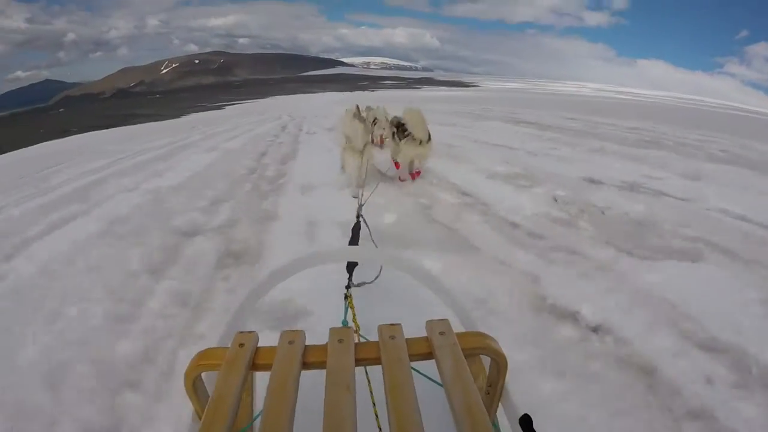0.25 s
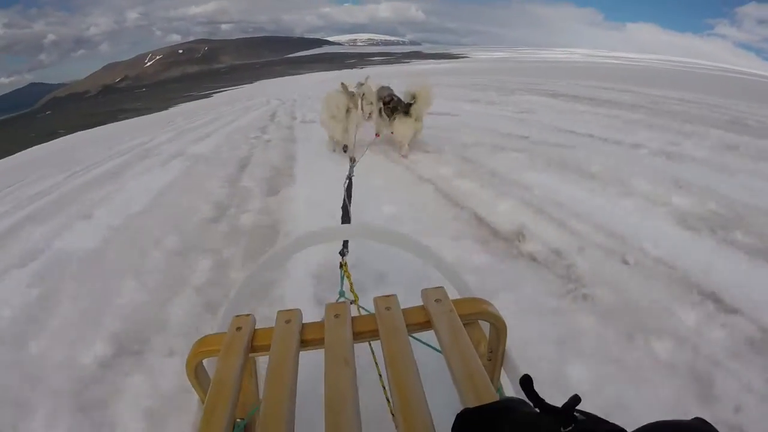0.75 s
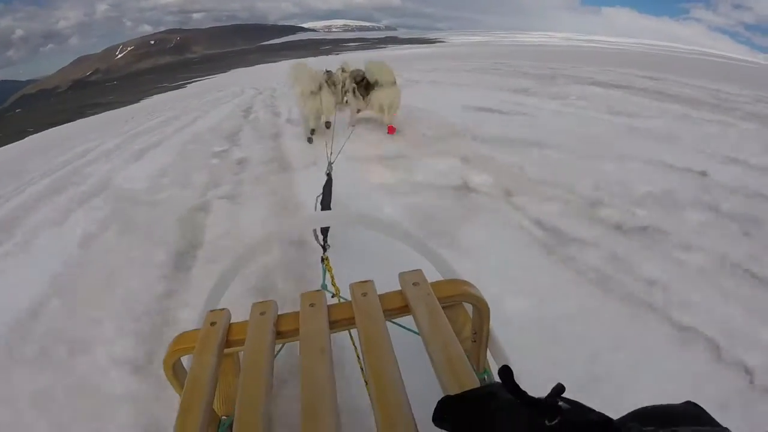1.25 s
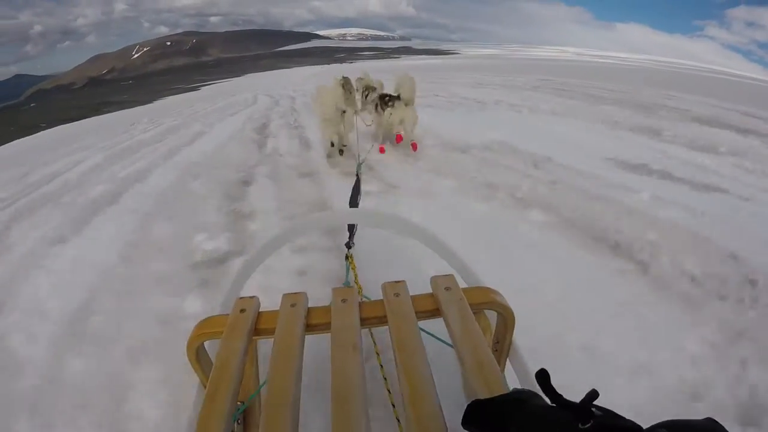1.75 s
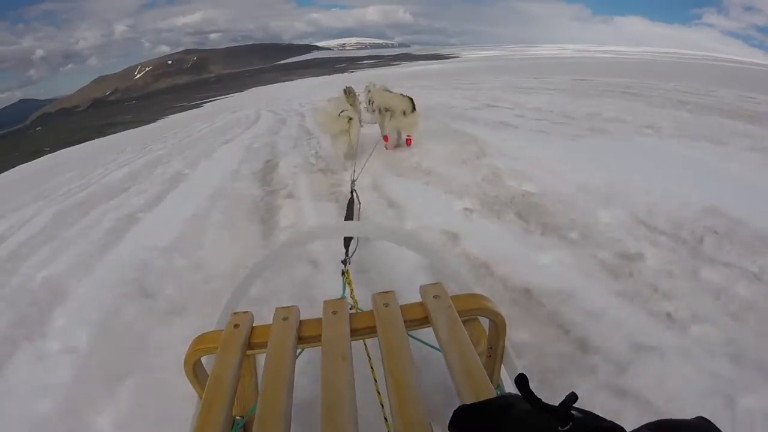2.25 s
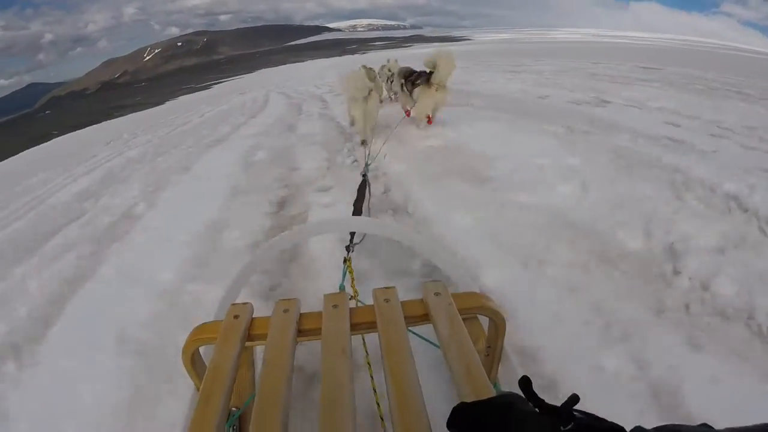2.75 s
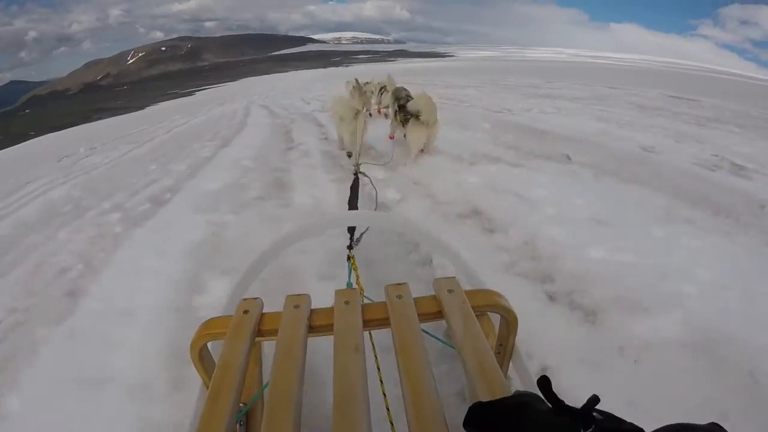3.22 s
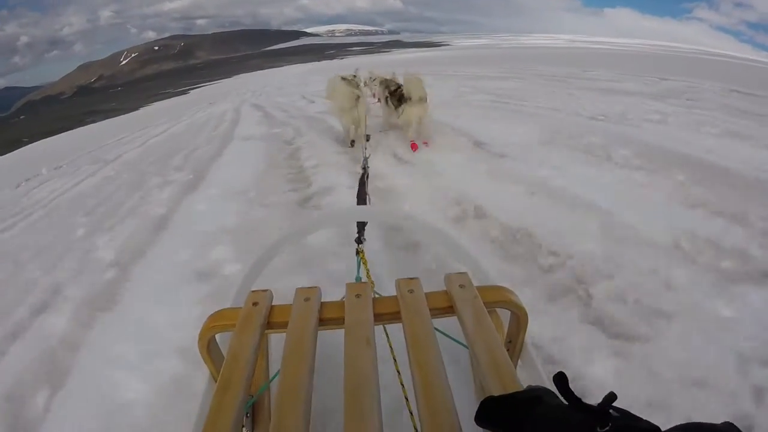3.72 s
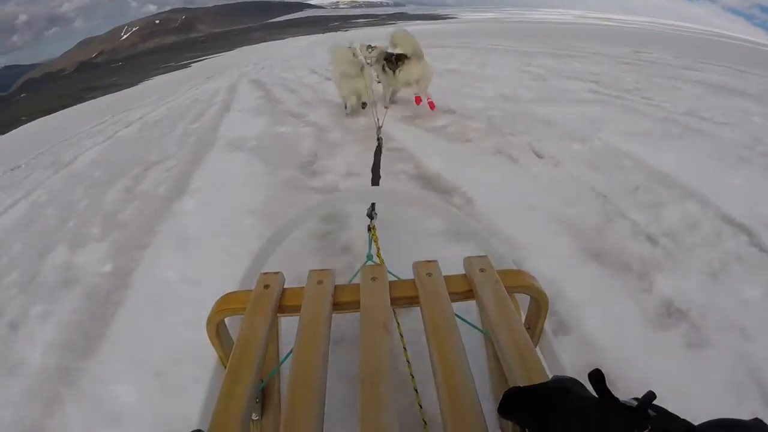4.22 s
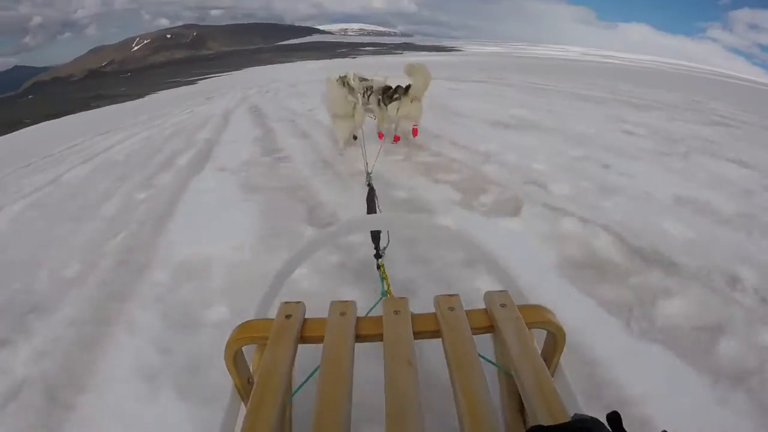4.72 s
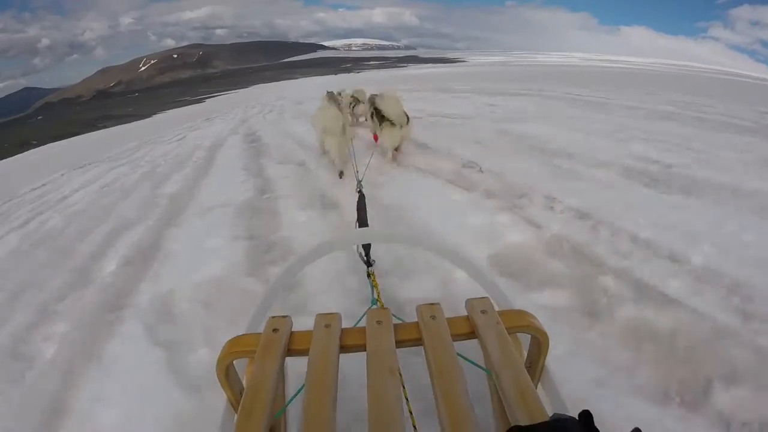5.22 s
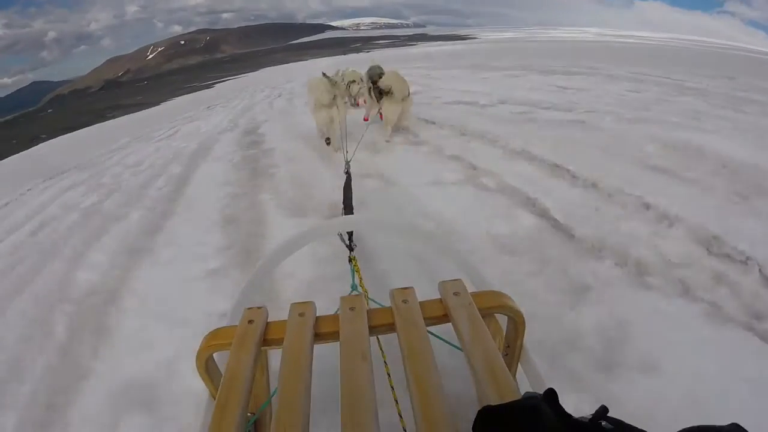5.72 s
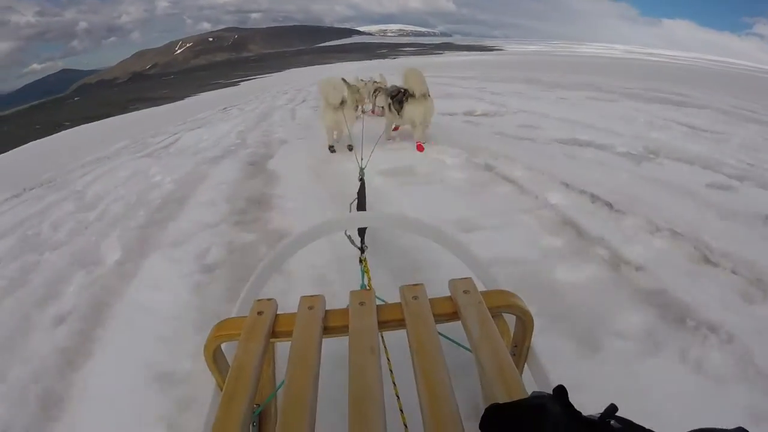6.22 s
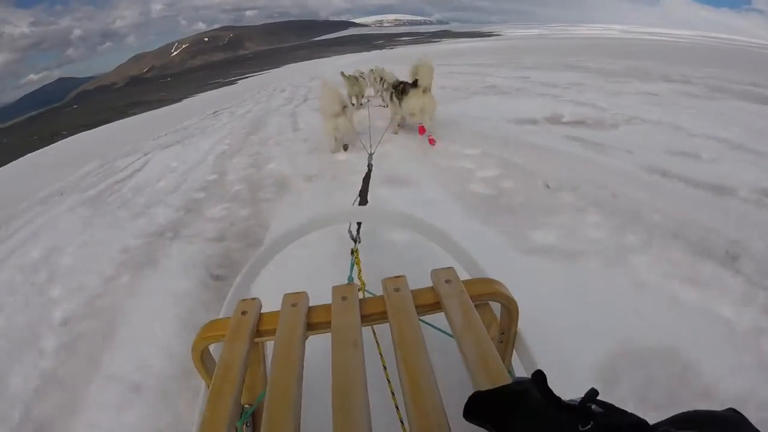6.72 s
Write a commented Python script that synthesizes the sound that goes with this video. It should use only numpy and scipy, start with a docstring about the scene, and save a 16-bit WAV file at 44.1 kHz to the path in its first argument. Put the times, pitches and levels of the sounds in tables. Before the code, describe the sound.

A wooden sled scrapes over rutted snow, its runners hissing in uneven swells and its frame knocking, while deep gusts buffet the microphone.

```python
"""Wind thumps and flutters over the gritty hiss of a dog sled gliding on packed, rutted snow.
We ride on the sled, listening from a small camera in a closed housing that the eddies buffet.
The runners grind snow grains, biting harder on each firm patch; the frame drones with them and the
housing's cavities colour the hiss. Now and then the wooden frame knocks on a rut, a metal clip ticks
and ice chips tap the housing."""
import sys
import numpy as np
from scipy import signal
from scipy.fft import rfft, irfft, next_fast_len
from scipy.io import wavfile
from scipy.ndimage import uniform_filter1d

SR = 44100
rng = np.random.default_rng(int(sys.argv[2]) if len(sys.argv) > 2 else 0)


def generate_wav(sig):
    """Save sig (samples, or channels by samples) to the path in sys.argv[1] as 16-bit PCM at SR."""
    pcm = np.round(np.clip(np.atleast_2d(sig).T, -1, 1) * 32767).astype(np.int16)
    wavfile.write(sys.argv[1], SR, pcm)


N = 307377

# Ticks of the metal clip: t/s, level/dB, f/Hz struck hardest
CLIP_HITS = [(0.646, -41, 8700), (0.796, -47, 9300), (1.0455, -39, 9050), (1.064, -36.5, 6840),
             (1.8344, -40, 8700), (1.842, -33, 8700), (1.845, -37, 7100), (1.8584, -39, 8990),
             (1.8654, -49, 6820), (5.5822, -36, 8150), (6.8838, -43, 7280)]
METAL_MODES = [(7020, -6, 0.024), (8600, 0, 0.0044), (9900, 2, 0.003), (11500, 1.5, .0025),
               (13900, 1, .003)]
# Ice chips thrown at the housing: t/s, level/dB, tilt toward the upper cavities/(dB per octave)
CHIP_HITS = [(0.65, -32, .1), (0.679, -26, 6), (0.754, -28.5, -3), (2.019, -23, 10), (2.04, -27, 8),
             (2.051, -25, 8), (2.12, -32, 8), (3.9583, -19, -.6), (4.201, -36, -3), (4.3161, -32, -1.5),
             (4.332, -26, -3), (6.07, -30, -3)]
# Ring of the housing's cavities: f/Hz, level/dB, t60/s
CAVITY_MODES = [(2350, 3, .014), (3720, 0, 0.011), (5700, -20, .006)]
# Hollow knocks of the frame on ruts: t/s, level/dB
RUT_HITS = [(0.648, -18), (0.754, -13), (1.234, -15), (2.081, -15), (2.213, -16.5), (3.116, -17),
            (3.179, -11), (3.691, -24), (4.319, -18), (4.333, -8), (4.642, -15), (6.07, -14), (6.078, -9),
            (6.085, -12), (1.394, -13), (4.328, -12), (4.344, -18), (1.365, -16), (1.41, -17), (1.46, -10),
            (3.24, -14)]
# Ring of the wooden slats: f/Hz, level/dB, t60/s
WOOD_MODES = [(595, -8, 0.039), (800, -5, 0.14), (930, 13.5, 0.037), (1170, -9, 0.03)]

# Hard patches of snow: bite t/s, ease-off t/s, sizzle at bite/dB, sizzle at ease-off/dB, fade/(dB/s),
# then trims: grind/dB, spray/dB, hiss/dB, dust/dB
HARD_PATCHES = [(0.0, 0.082, -40, -44.5, 97, -1.5, 3.5, 0, .1),
                (.39, 0.49, -54, -52, 47.5, -3.5, 4, -1, .1),
                (.525, .675, -48, -47.5, 60, -3, 3.5, -0.5, 2), (.72, 0.79, -49, -48.5, 58, -2, 4, 0, .1),
                (1.142, 1.253, -50.5, -45, 60, -2.5, 2.5, -1, 2),
                (1.26, 1.37, -43.5, -38.5, 60, -1, 2, 1.5, 2),
                (1.374, 1.45, -37, -38.5, 42, 1.5, 1.5, 2.5, -5),
                (1.47, 1.613, -39.5, -42, 53, 0.5, 1.5, 1, .1), (1.747, 1.9, -47, -51, 48, 1, 0, 2.5, .1),
                (2.053, 2.09, -52, -47, 60, -1.5, 4, 1, .1), (2.1, 2.19, -46.5, -46, 60, -1, 1.5, -0.3, 13),
                (2.238, 2.32, -46.5, -45, 50, -3, 3.5, -1.5, 2.1),
                (2.728, 2.863, -47.5, -43, 25, -1.5, 3, -0.8, .1),
                (2.875, 3.113, -46, -43, 26, -0.3, 4, 1.5, -4), (3.153, 3.256, -40.5, -42, 46, 1, 2, 1, -1),
                (3.28, 3.378, -43.5, -46, 45, -2, 2, -1.5, .1),
                (3.547, 3.78, -54, -48, 57, 0.5, 2, -0.2, .1), (3.82, 3.923, -49.5, -50, 43, 1, 4, 1.5, .1),
                (4.254, 4.3, -43.5, -47.5, 34, 1, 6, 1, 8),
                (4.318, 4.37, -38.5, -40.5, 34, -2.5, 2.5, -1, 9),
                (4.435, 4.55, -40, -39.5, 33, -2, 2.5, -1.5, 4),
                (4.61, 4.817, -39.5, -39, 48, -1.5, 2.5, -1.5, .1),
                (5.055, 5.134, -49, -40, 28, -3, 2.5, -1.8, -2.1),
                (5.138, 5.26, -42, -43, 35, -2.5, 0.5, -2.5, -4),
                (5.598, 5.672, -55, -44, 35, -0.8, 5, -1, -2.1),
                (5.68, 5.788, -44, -43, 37, -0.8, 3.5, -0.3, -5),
                (5.81, 5.963, -43.5, -44.5, 17, -2.5, 3.5, -0.2, 2),
                (6.04, 6.17, -44.5, -42, 60, -1.2, 2.5, 0, .1),
                (6.416, 6.594, -51.5, -49.5, 55.5, 0.5, 2.5, 0.7, -4),
                (6.735, 6.97, -53.5, -48, 50, -2.1, 4, 0, .1)]
# The runners' load shifts briefly over ridges: t/s, sizzle dip/dB (negative swells)
RIDGES = [(2.0, -3.5), (2.7, 0), (4.205, 0.5), (5.6, 0), (6.66, 2.5)]
# Grind, the frame droning up to 1 kHz: f/Hz, level/dB
GRIND_EQ = [(240, -22), (400, -5.5), (525, -2), (563, -2.5), (604, 0), (760, 0.4), (933, 2), (983, 1),
            (1070, -7), (1240, -8), (1370, -18), (1600, -40), (2080, -55), (3520, -120)]
# Hiss, ringing in two housing cavities: f/Hz, level/dB
HISS_EQ = [(880, -38), (1500, -3.5), (1690, -3), (1920, -1), (2220, 4), (2400, 4), (2560, 4), (2790, -5),
           (2920, -7), (3610, 1), (3810, -2), (4230, -21.5), (4400, -23), (5720, -75), (9680, -120)]
# Sizzle, ringing in a third cavity: f/Hz, level/dB
SIZZLE_EQ = [(2530, -24), (4350, -7), (4950, -1.5), (5400, 3.5), (5700, 4), (6150, 1), (6450, -0.2),
             (6800, -1), (7400, -12.5), (9490, -26.5), (16100, -120)]
# Bright snow spray: f/Hz, level/dB
SPRAY_EQ = [(4290, -100), (7500, -.6), (8300, 2), (11900, -0.5), (12800, -4.5), (16600, -42), (22000, -120)]
# Snow dust, the airy top: f/Hz, level/dB
DUST_EQ = [(9000, -40), (12500, -9), (13300, 1.5), (14600, 1.5), (15100, -3)]

# Slow ride of the wind's strength: t/s, buffet level/dB, flutter level/dB
WIND_LEVELS = [(0.0, -15, -24), (0.37, -13.5, -25), (0.78, -20.5, -27), (1.08, -18.5, -28.5),
               (1.34, -17.5, -24), (2.31, -17, -26), (2.48, -19.5, -30), (3.09, -14, -21.5),
               (3.38, -19, -33), (3.75, -21, -27), (4.12, -18.5, -29.5), (4.42, -18.5, -23.5),
               (4.7, -17, -23.5), (5.34, -12, -23), (5.94, -17.5, -25.5), (6.97, -20, -29.5)]
# Single gusts and brief lulls: t/s, buffet boost/dB, flutter boost/dB
GUSTS = [(.1, 6.5, 5), (.16, -4.5, -10), (.27, 2, 3.5), (.45, -2, 1), (.6, -1.5, -0.5), (.7, 0.5, -5.5),
         (.78, 5, 4.5), (.97, -4, -5), (1.2, 4.5, 5), (1.38, 2.5, 5.5), (1.28, 0, 4.5), (1.61, 1.5, 1),
         (1.75, 3, 1.5), (1.95, 2.5, 1.5), (2.2, -2.5, 4.5), (2.8, -1, 6), (2.08, 5, 2.5), (2.46, 9, 4.5),
         (3.03, 2.5, 4.5), (3.2, -4, 9), (3.34, -5, 5), (3.76, 11.5, 1), (4.02, -9, -1), (4.25, 6.5, 1.5),
         (4.37, 5.5, 5), (4.73, 8.5, 5.5), (4.86, -8, 5.5), (4.99, 7.5, 9.5), (5.27, -0.5, -1),
         (5.4, 0, 1.5), (5.49, -2, -3.5), (5.57, 0, 2), (5.64, 3.5, 0.5), (5.76, 5.5, -8),
         (5.83, -11, -0.5), (5.95, -5, -0.5), (6.15, 0, 1.5), (6.29, 0, 2), (6.37, 7.5, 2.5),
         (6.579, 4, 10.5), (6.85, 5.5, 7), (6.92, 1.5, 3.5)]
# Deep buffeting on the housing: f/Hz, level/dB
BUFFET_EQ = [(5, -22), (10, -0.5), (18, 1.5), (28, 0.5), (50, 2), (75, -2.5), (115, -9), (150, -40.5),
             (250, -120)]
# Quicker flutter above the buffeting: f/Hz, level/dB
FLUTTER_EQ = [(74, -19.5), (125, -0.5), (180, -5.5), (250, -14), (400, -36), (700, -120)]
# Rustle, the top of the flutter: f/Hz, level/dB
RUSTLE_EQ = [(150, -30), (230, -3.5), (300, 0.5), (430, -5), (560, -9.5), (950, -110)]

SOFT_DB, FIRM_DB, THICK_DB = -55.5, -45, -51  # sizzle on soft snow, on firm snow; thick spray
BITE_DB_PER_S, RIDGE_HALF_WIDTH_S, GUST_HALF_WIDTH_S = 480, 0.027, 0.037
SPRAY_LAG_S, SPRAY_DUCK = 0.042, 0.3  # spray loses this many dB per dB of sudden rise in sizzle
DUST_FADE = 0.08  # dB lost per squared dB of spray under THICK_DB
RUSTLE_DB, RUSTLE_SHARE = -7, 0.52  # rustle against flutter; extra share of the flutter's gust boost
CHIP_ATTACK_S, HIGH_CUT_HZ = 0.0011, 15154
HOP = 64  # samples per step of the patch and gust envelopes


def undb(db):
    """Decibels to amplitude."""
    return 10 ** (np.asarray(db) / 20)


def unit_rms(x):
    """Scale to an RMS of 1."""
    return x / np.sqrt(np.mean(x ** 2))


def wobble(rate_hz):
    """Smooth random modulation with a spread of 1: stepped levels, slewed twice."""
    hold = int(SR / rate_hz)
    steps = np.repeat(rng.standard_normal(N // hold + 1), hold)
    smooth = uniform_filter1d(uniform_filter1d(steps, hold), hold)[:N]
    return smooth / np.std(smooth)


def colour(x, eq, flicker_db, rate_hz, bands):
    """EQ a sound and let its overlapping bands flicker independently; RMS 1."""
    size = next_fast_len(N)
    hz, db = np.transpose(eq)
    log_hz = np.log(np.arange(1, size // 2 + 2) * SR / size)
    shaped = rfft(x, size) * undb(np.interp(log_hz, np.log(hz), db))
    centres = np.linspace(np.log(hz[1]), np.log(hz[-2]), bands)
    split = (irfft(shaped * np.interp(log_hz, centres, row), size)[:N] for row in np.eye(bands))
    return unit_rms(sum(undb(flicker_db * wobble(rate_hz)) * band for band in split))


def ring(modes, blow):
    """Decaying modes driven by the force of a blow; peak 1."""
    t = np.arange(SR // 10) / SR
    free = sum(undb(db) * np.sin(2 * np.pi * hz * t) * 1000 ** (-t / t60) for hz, db, t60 in modes)
    struck = signal.fftconvolve(free, blow)[:len(t)]
    return struck / np.max(np.abs(struck))


def place(track, start_s, sound):
    """Mix a one-shot into a track."""
    at = int(start_s * SR)
    track[at:at + len(sound)] += sound[:N - at]


def clip_ticks():
    """A brief rattle rings the small metal modes, strongest near the struck frequency."""
    track, t = np.zeros(N), np.arange(SR // 20) / SR
    for start_s, level_db, struck_hz in CLIP_HITS:
        modes = [(hz, db - 18 * abs(np.log2(hz / struck_hz)), t60) for hz, db, t60 in METAL_MODES]
        rattle = rng.standard_normal(len(t)) * 1000 ** (-t / 0.051)
        place(track, start_s, undb(level_db) * ring(modes, rattle))
    return track


def ice_chips():
    """A chip taps the housing and its cavities answer for a few milliseconds."""
    track, tap = np.zeros(N), np.hanning(int(0.00026 * SR))
    attack = np.clip(np.arange(SR // 10) / (CHIP_ATTACK_S * SR), 0, 1)
    lowest_hz = CAVITY_MODES[0][0]
    for start_s, level_db, tilt in CHIP_HITS:
        modes = [(hz, db + tilt * np.log2(hz / lowest_hz), t60) for hz, db, t60 in CAVITY_MODES]
        place(track, start_s, undb(level_db) * attack * ring(modes, tap))
    return track


def frame_knocks():
    """A runner drops into a rut: a short, soft push, and the slats ring briefly."""
    track, push = np.zeros(N), np.hanning(int(0.0014 * SR))
    for start_s, level_db in RUT_HITS:
        modes = [(hz, db + 3 * rng.standard_normal(), t60) for hz, db, t60 in WOOD_MODES]
        place(track, start_s, undb(level_db) * ring(modes, push))
    return track


def snow_patches():
    """Sizzle bites, holds and fades on each hard patch; the loudest patch sets the four trims, in dB."""
    t = np.arange(0, N, HOP) / SR
    bite_s, ease_s, bite_db, ease_db, fade, *trims = np.transpose(HARD_PATCHES)[:, :, None]
    held_db = bite_db + (ease_db - bite_db) * np.clip((t - bite_s) / (ease_s - bite_s), 0, 1)
    patch_db = held_db - BITE_DB_PER_S * np.maximum(bite_s - t, 0) - fade * np.maximum(t - ease_s, 0)
    loudest = patch_db.argmax(axis=0)
    trims_db = [uniform_filter1d(trim[loudest, 0], size=8) for trim in trims]
    dip_db = sum(db * np.exp(-((t - s) / RIDGE_HALF_WIDTH_S) ** 2) for s, db in RIDGES)
    sizzle_db = np.maximum(patch_db.max(axis=0), SOFT_DB) - dip_db
    return [np.interp(np.arange(N) / SR, t, curve) for curve in [sizzle_db] + trims_db]


def snow_grains(share, spread_db):
    """Crystals snap on this share of all samples, a few louder than the rest."""
    snaps = rng.random(N) < share
    size_db = spread_db * rng.exponential(size=N)
    return unit_rms(snaps * rng.standard_normal(N) * undb(size_db))


def runners(jolts_db):
    """One stream of breaking crystals feeds five layers, grind up to dust; jolts shake the grind."""
    sizzle_db, grind_trim, spray_trim, hiss_trim, dust_trim = snow_patches()
    # Grind, hiss and spray ride the sizzle's level, each at its own ratio.
    firmness_db = sizzle_db - FIRM_DB
    grind_db = -26.5 + 0.54 * firmness_db + grind_trim + 0.7 * jolts_db
    hiss_db = -39.5 + 0.74 * firmness_db + hiss_trim
    slew = 1 / (SPRAY_LAG_S * SR)
    lagged_db = signal.lfilter([slew], [1, slew - 1], firmness_db - firmness_db[0]) + firmness_db[0]
    rise_db = np.maximum(firmness_db - lagged_db, 0)
    spray_db = -56 + 0.94 * firmness_db + spray_trim - SPRAY_DUCK * rise_db
    # Dust rides the spray and dies away faster as it thins.
    thickness_db = spray_db - THICK_DB
    dust_db = -62 + 1.9 * thickness_db + dust_trim - DUST_FADE * np.minimum(thickness_db, 0) ** 2

    snow = snow_grains(share=0.6, spread_db=1.1) * undb(0.32 * wobble(30))
    grind = colour(snow, GRIND_EQ, flicker_db=0.78, rate_hz=27, bands=3) * undb(grind_db)
    hiss = colour(snow, HISS_EQ, flicker_db=0.89, rate_hz=17, bands=3) * undb(hiss_db)
    sizzle = colour(snow, SIZZLE_EQ, flicker_db=0.92, rate_hz=20.88, bands=2) * undb(sizzle_db)
    spray = colour(snow, SPRAY_EQ, flicker_db=1.6, rate_hz=30, bands=6) * undb(spray_db)
    spray *= undb(0.48 * wobble(8) + 0.6 * wobble(30))
    dust = colour(snow, DUST_EQ, flicker_db=3.5, rate_hz=12, bands=3) * undb(dust_db)
    return grind + hiss + sizzle + spray + dust


def wind(jolts_db):
    """Eddies press on the housing in puffs: deep thuds, plus a flutter and rustle that jolts shake."""
    t = np.arange(N) / SR
    cue_s, *levels = np.transpose(WIND_LEVELS)
    buffet_db, flutter_db = [np.interp(t, cue_s, level) for level in levels]
    gust_s, *boosts = np.transpose(GUSTS)
    swells = np.exp(-((t[::HOP] - gust_s[:, None]) / GUST_HALF_WIDTH_S) ** 2)
    buffet_boost_db, flutter_boost_db = np.repeat(boosts @ swells, HOP, axis=1)[:, :N]
    puffs = undb(0.78 * wobble(12))
    buffet = colour(rng.standard_normal(N), BUFFET_EQ, flicker_db=0.94, rate_hz=6.6, bands=3)
    buffet *= undb(buffet_db + buffet_boost_db)
    flutter = colour(rng.standard_normal(N), FLUTTER_EQ, flicker_db=0.5, rate_hz=11, bands=2)
    flutter *= undb(flutter_boost_db)
    rustle = colour(rng.standard_normal(N), RUSTLE_EQ, flicker_db=0.29, rate_hz=15, bands=2)
    rustle *= undb(RUSTLE_DB + RUSTLE_SHARE * flutter_boost_db)
    return puffs * (buffet + undb(flutter_db + 0.5 * jolts_db) * (flutter + rustle))


def scene():
    """Mono mix with the wind up front; the same sled jolts shake wind and runners."""
    jolts_db = wobble(20)
    return (wind(jolts_db) + runners(jolts_db) + frame_knocks() + clip_ticks() + ice_chips())[None]


def record(dry):
    """The camera soft-clips the loudest buffets and cuts the top."""
    rounded = np.tanh(1.3 * dry) / 1.1
    high_cut = signal.ellip(12, 0.2, 80, HIGH_CUT_HZ, fs=SR, output="sos")
    return signal.sosfilt(high_cut, rounded)


dry = scene()
out = record(dry)
generate_wav(out)
```